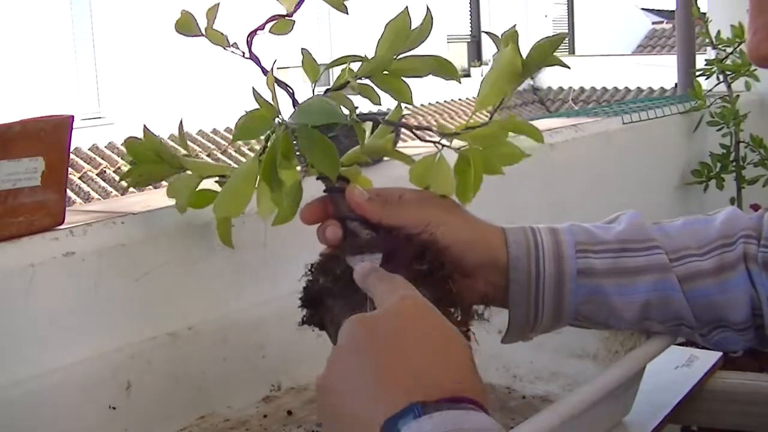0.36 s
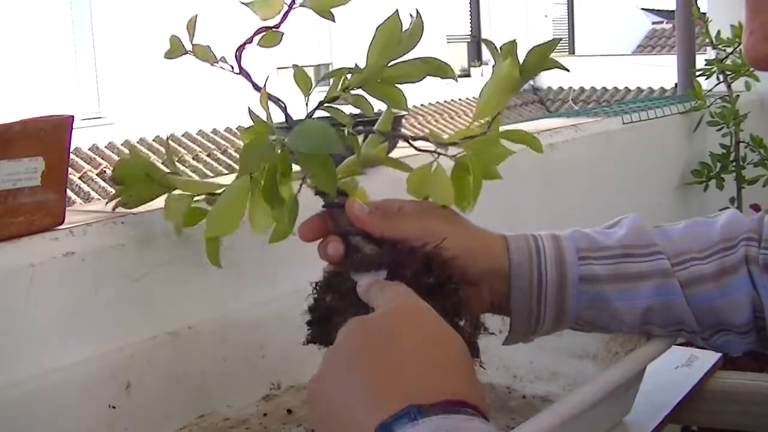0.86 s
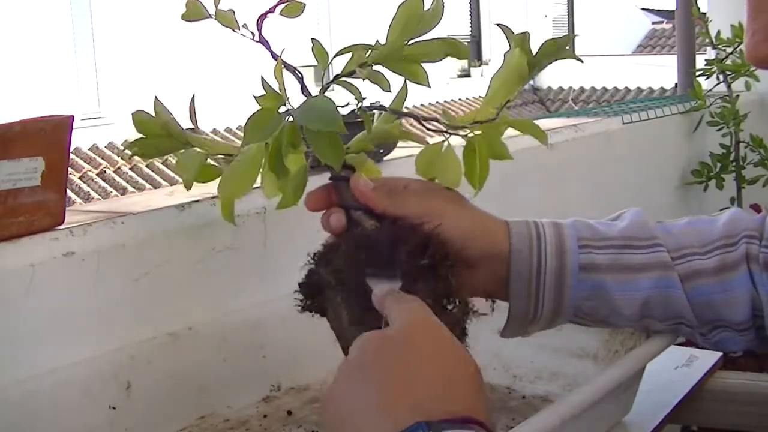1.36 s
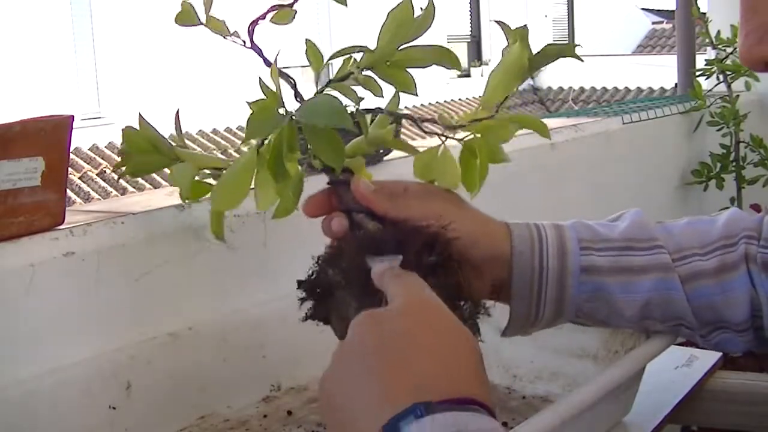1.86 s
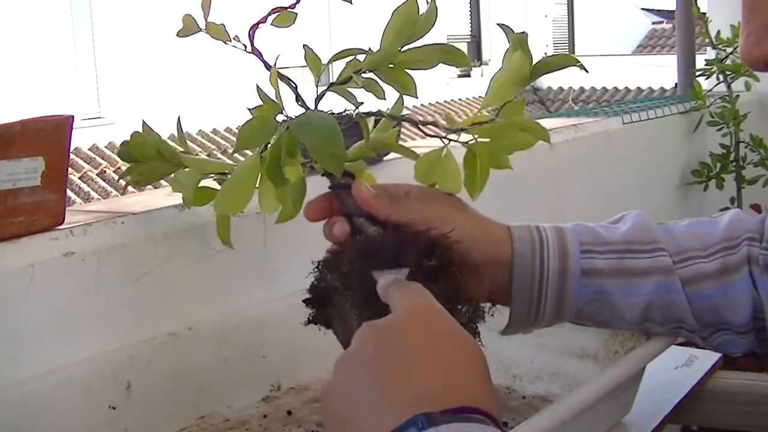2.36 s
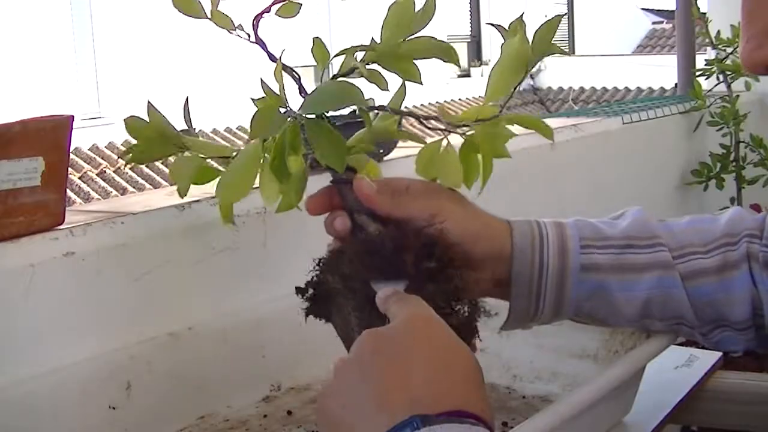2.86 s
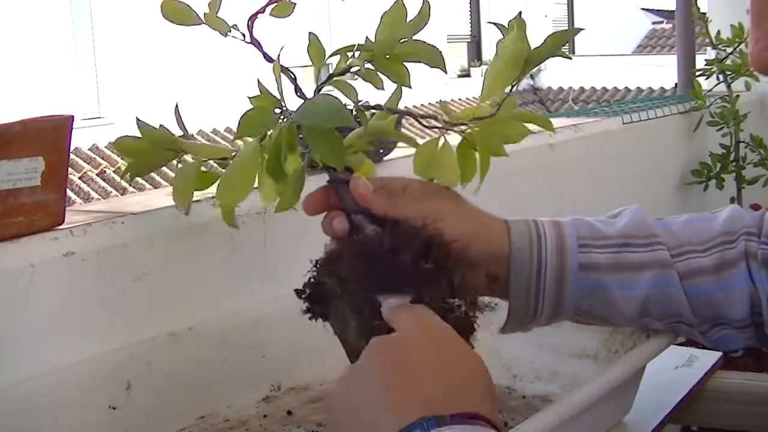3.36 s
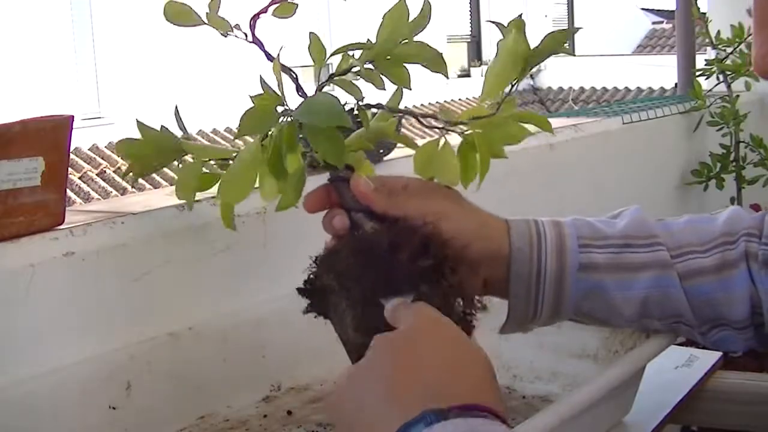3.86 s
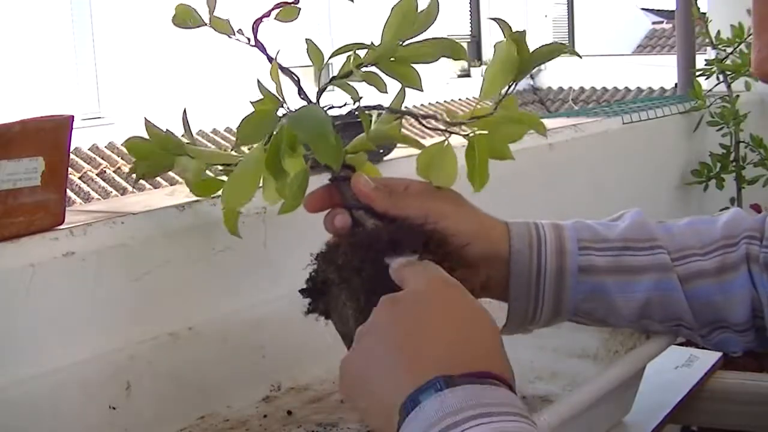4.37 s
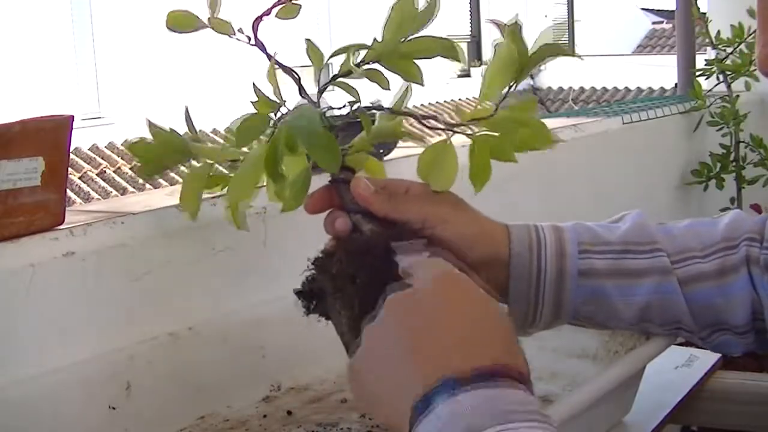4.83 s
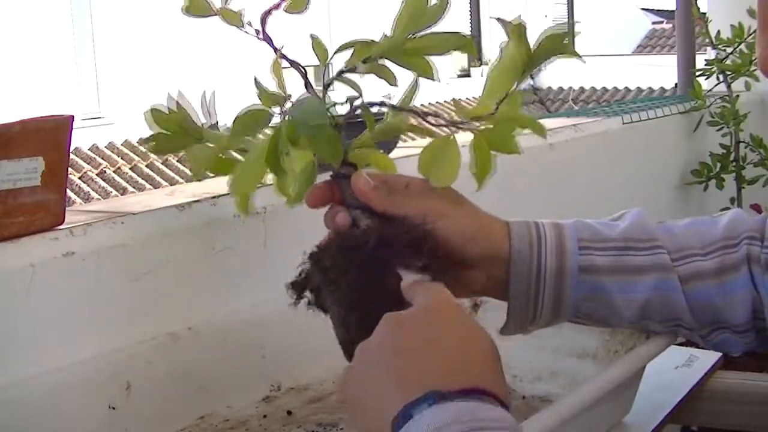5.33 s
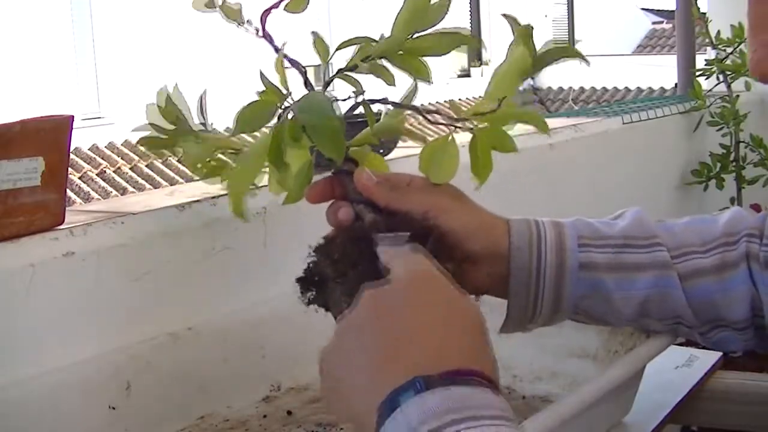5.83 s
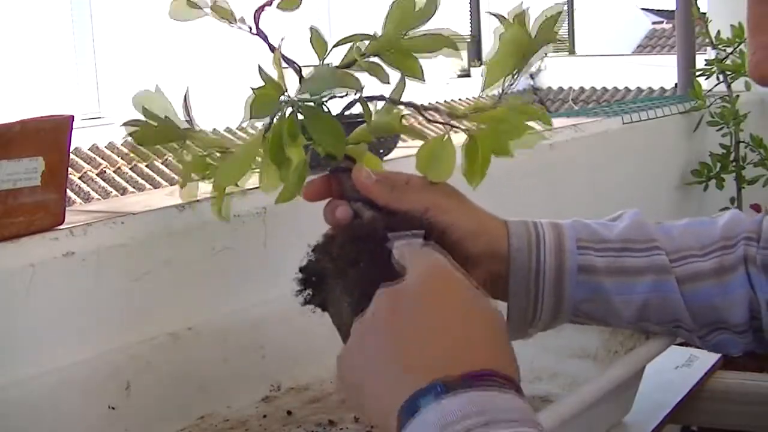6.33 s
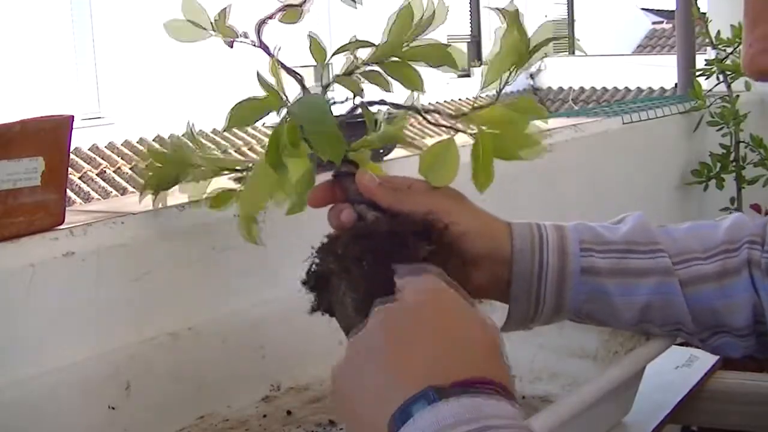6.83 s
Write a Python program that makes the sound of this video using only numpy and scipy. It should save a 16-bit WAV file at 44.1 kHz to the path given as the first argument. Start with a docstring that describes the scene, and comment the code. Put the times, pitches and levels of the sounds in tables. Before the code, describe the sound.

Close, dry crackles and gritty rasps as fingers pick soil from a root ball, with crumbs pattering and a few soft clod thuds outdoors.

```python
"""A walled terrace: fingers pick at a root ball close to the microphone.
Cracks of crust and rootlet are sharp noise breaks with crumbling grains, then crumbs and the walls' brief answer.
Crumbs rasp under the fingertips as dense grainy noise, gated by strokes and chance slips.
Clods thud on the ledge as decaying sines. Behind them shaped noise gives a far town's murmur in the lows and
microphone hiss in the treble, with a few faint wavering hums.
"""
import sys
import numpy as np
from scipy import signal
from scipy.fft import rfft, irfft, next_fast_len
from scipy.io import wavfile
from scipy.ndimage import uniform_filter1d, map_coordinates

SR = 44100
rng = np.random.default_rng(int(sys.argv[2]) if len(sys.argv) > 2 else 0)


def gain_from_decibels(decibels):
    """Convert decibel values to linear amplitude factors."""
    exponent = np.asarray(decibels, float) / 20
    return 10 ** exponent


def transcribe(signal):
    """Save signal, clipped to [-1, 1], as a 16-bit WAV file at the path in sys.argv[1]."""
    frames = np.atleast_2d(signal).T
    limited = np.clip(frames, -1, 1)
    pcm = np.round(limited * 32767).astype(np.int16)
    wavfile.write(sys.argv[1], SR, pcm)


N = 306936

# Background level, partly raised by nearby hits. Each row: time in seconds, rms level in dB.
BACKGROUND_LEVEL = [(0.0, -57), (0.48, -57), (2.54, -57.5), (2.89, -56.5), (5.41, -56), (5.5, -54),
                    (6.69, -59), (6.96, -54)]
# Background spectrum: far murmur in the lows, steady microphone hiss in the treble.
# Each row: frequency in Hz, relative density in dB per Hz.
BACKGROUND_SPECTRUM = [(15, -63), (25, -11), (113, -11), (271, 9.5), (485, 13.5), (1970, 8.5), (2310, 5.5),
                       (4030, 3.5), (11300, -10.5), (13600, -12.5), (16000, -29)]
# Faint far hums. Each row: start in seconds, end in seconds, mean frequency in Hz, mean peak level in dB.
HUMS = [(1.97, 2.1, 445, -62), (1.92, 1.98, 520, -63), (2.82, 2.96, 680, -62), (3.85, 4.15, 480, -66),
        (4.06, 4.14, 530, -60), (4.28, 4.37, 662, -56), (3.4, 3.85, 1090, -66), (4.85, 5.15, 1090, -65),
        (0, .5, 1095, -68), (2.3, 2.6, 1090, -68)]
# Air noise, opposite in the two ports. Each row: frequency in Hz, relative density in dB per Hz.
AIR_SPECTRUM = [(15, -46), (25, 0), (133, 0), (385, 10), (730, 12.5), (2760, 3.5), (3710, 3), (6530, -2),
                (9000, -42), (11700, -49), (19800, -120)]
AIR_RMS_DB = -72
# Scrambled trace of the scene in the side. Each row: frequency in Hz, side over mid in dB.
SIDE_OVER_MID = [(150, -58), (500, -40), (2000, -24.5), (5000, -16.5), (9000, -21.5), (13000, -25)]

# Soil bands: body, rasp, hiss, fizz. Each row: lower edge in Hz, upper edge in Hz.
SOIL_BANDS = [(650, 1500), (1600, 3800), (3800, 7500), (7500, 12000)]
SOIL_TOP_HZ = 11100  # soil sounds fade above
# Resonances near the microphone. Each row: centre in Hz, width in Hz, gain in dB.
MIC_RESONANCES = [(1320, 490, -2), (2322, 120, 2.5), (3377, 220, 3.5), (4540, 210, -4.5),
                  (5050, 380, -13.5), (6660, 980, -12.5), (8000, 1030, -8), (9680, 710, -7),
                  (11290, 1000, -1.5)]
TOP_CUTOFF_HZ = 13800

# Fingers resting in the soil, rasp to fizz. Each row: mean gain in dB, drift in dB.
RESTING = [(-81.5, -2), (-70.5, 5.5), (-71.5, 5.5)]
# Finger strokes through the soil. Each row: start in seconds, length in seconds, gain in dB at 5.2 kHz,
# brightness in dB per octave.
STROKES = [(0.025, 0.14, -52, 0.5), (0.25, 0.025, -59.5, 2), (0.357, 0.15, -57, -0.5),
           (0.596, 0.023, -54.5, -7.5), (0.66, 0.14, -64, 0.5), (1.033, 0.086, -50, 2.2),
           (1.23, 0.07, -77, 6), (1.328, 0.098, -55.5, 7.5), (1.625, 0.033, -51, 4),
           (1.937, 0.034, -57.5, 6.5), (2.12, 0.032, -68, 7), (2.281, 0.081, -54, 4),
           (2.52, 0.064, -57, 13.5), (2.669, 0.033, -59.5, 3.5), (2.82, 0.17, -61.5, 1),
           (3.077, 0.042, -49, 0.6), (3.184, 0.031, -57.5, 2.5), (3.327, 0.098, -60, 2.5),
           (3.448, 0.057, -55.5, 2), (3.541, 0.17, -60, 2), (3.838, 0.11, -58, 1), (3.95, 0.042, -54, 4),
           (4.105, 0.094, -53.5, 0.5), (4.205, 0.065, -63, 2), (4.371, 0.1, -44.5, -1.5),
           (4.52, 0.028, -58.5, 4), (4.667, 0.14, -47, 2), (4.957, 0.16, -53, 2), (5.18, 0.06, -67, 5),
           (5.343, 0.073, -53.5, -5.5), (5.602, 0.027, -40, -3), (5.717, 0.031, -57, 6.5),
           (5.881, 0.15, -50, -2.5), (6.144, 0.053, -51, -2), (6.203, 0.14, -60, -2.8),
           (6.424, 0.11, -54.5, 0.5), (6.539, 0.043, -49.5, 6), (6.691, 0.086, -47, 1),
           (6.79, 0.15, -55.5, -1)]
PRESS_S, LIFT_S = 0.0049, 0.0078  # time constants of a stroke's rise and fall
SLIPS_PER_S, SLIP_S = 120, 0.0043  # mean rate, nominal length
SLIP_DB, SLIP_SPREAD_DB, SLIP_COLOUR_DB = -3.5, 2.5, 4  # median gain, shared spread, spread per band
BETWEEN_SLIPS_DB = -7

# Clods landing. Each row: time in seconds, peak level in dB.
CLODS = [(0.009, -46), (0.22, -51.5), (0.956, -38), (2.173, -40), (5.498, -44.5), (5.629, -50),
         (6.913, -47)]
# Modes of the ledge. Each row: frequency in Hz, relative level in dB, t60 in seconds.
LEDGE_MODES = [(184, -6, .12), (275, -7, .09), (350, -4, .06), (434, 0, .07), (525, -6, .06)]
LEDGE_LOW_HZ = 128

# Cracks. Each row: time in seconds, level in dB at 3 kHz before the band colour, brightness in dB per octave,
# afterfall of crumbs and echoes in dB before the band offset.
CRACKS = [(0.0308, -47, 6.5, -25), (0.0687, -45, 8.5, -25), (0.1431, -51, 4, -5), (0.2172, -50.5, -8, -13),
          (0.259, -54.5, -2, -13), (0.3497, -47.5, 5, -9), (0.3985, -46, 7.5, -12), (0.4223, -37, 2.2, -11),
          (0.508, -45, -2.5, -13), (0.5408, -40.5, 3.3, -12), (0.5949, -45.5, 5.5, -16),
          (0.6662, -63, 16.5, -10), (0.7171, -41, 5, -9), (0.7885, -57, -1, -13), (0.8665, -25, 1.8, -13),
          (0.9174, -47.0, -3, -8), (0.9521, -36.5, -4, -11), (0.9767, -25.5, 2.5, -13),
          (0.993, -39, -1.5, -4.5), (1.0717, -39, -0.5, -8.5), (1.2351, -52, 1.0, -10),
          (1.345, -54, -3, -10), (1.3576, -47, 7, 2), (1.509, -30.5, 2, -9.5), (1.57, -41.5, 0, -6),
          (1.6077, -50.5, 11.5, -7), (1.6466, -55, -5, -13), (1.7107, -52.0, 4, -7), (1.7215, -50, 0, -8),
          (2.131, -54.5, 0.6, -11), (2.173, -38.5, -4.5, -12), (2.2475, -49, 8, -19),
          (2.2954, -63, 4.8, -16), (2.329, -61, 17, -15), (2.3477, -60, 11, -18), (2.3703, -43.5, 5.5, -5),
          (2.3875, -52, 10, -8), (2.4873, -54, 0.5, -13), (2.5263, -52, 12.5, -22), (2.5536, -43, 1.5, -6),
          (2.5893, -42.0, 4.5, -15), (2.631, -56, -5, -15), (2.6955, -51.0, 6, -18), (2.7626, -39, -7, -10),
          (2.809, -36.5, 2, -8.5), (2.8198, -52, 16, -16), (2.8498, -43.0, 7.5, -10),
          (2.8994, -36.0, 1.5, -12), (2.9918, -51, 1, -7), (3.056, -51.5, -0.1, -19), (3.0794, -61, 7, -10),
          (3.0998, -25.0, 3.3, -12), (3.173, -43.5, 1, -13), (3.2053, -42.5, 0, -13),
          (3.2341, -51, -6, -12), (3.2895, -59, -6, -19), (3.309, -49.5, 1, -15), (3.3367, -54, 10.5, -1),
          (3.4929, -47.5, 6.5, -5), (3.561, -41, 3, -13), (3.5803, -50, 7, -1), (3.7798, -39, 3, -5),
          (3.8445, -43, 10.5, 2), (3.867, -56, 9, -10), (4.057, -25.0, 3, -11.5), (4.1124, -41, 1.5, -19),
          (4.1291, -48, 3, 1), (4.1491, -40, 2, -3), (4.173, -45, -1, -9), (4.227, -52.5, 3, -5),
          (4.3189, -48.5, 0.5, -18), (4.3635, -27, 1, -10), (4.3876, -37.5, 7, -23),
          (4.4116, -36, 3.5, -12), (4.4504, -34.5, 0, -8.5), (4.5458, -51, 2.5, -9),
          (4.625, -42, 4.5, -8.5), (4.6567, -45, 6.5, -21), (4.6707, -40.5, 7, -1),
          (4.6788, -28.5, -3, -11.5), (4.7204, -34.5, -2.1, -5.5), (4.776, -60, 2, -15),
          (4.8861, -39, 1, -11), (4.9321, -56, -8.5, -22), (4.9602, -49, 8, -16), (5.0194, -69, 3, -13),
          (5.0306, -51, 11, -5), (5.0692, -42, 13, -11), (5.1685, -38.0, 4.5, -15), (5.2416, -55, 4, -17),
          (5.3001, -37, 2.5, -10), (5.357, -33, 9, -9), (5.363, -28.5, 2.5, -9), (5.3968, -49, 1.2, -11),
          (5.4122, -46.0, 2, -7), (5.4313, -46.5, -2, -9), (5.4623, -47.5, 3.5, -13),
          (5.5022, -43.0, -7, -11), (5.532, -57, -2, -16), (5.5523, -33, -1.5, -12), (5.6029, -44.5, 8, -1),
          (5.6284, -18.0, -0.5, -9.5), (5.6777, -30.5, 3.5, -8), (5.7214, -45, 2, -9),
          (5.7352, -46.5, -2.7, -6), (5.7883, -57.5, -10, -13), (5.887, -40, 11, -10),
          (5.9285, -38.5, 4, -3), (5.9334, -40, -2, -27), (5.9885, -29.0, 3.5, -13), (6.0371, -48, 3, -8),
          (6.0564, -39.0, 5.5, -12), (6.0826, -47.0, -0.9, -20), (6.123, -49.5, 4, -6),
          (6.154, -53, 8, -11), (6.1776, -26.5, 2.1, -10.5), (6.234, -52, 0, -13), (6.2788, -54, 4.5, 11),
          (6.3312, -53, 6, -18), (6.3446, -45.5, 5.5, -1), (6.42, -44, -1.5, -10), (6.4321, -43, 9.5, -6),
          (6.533, -52, 5.3, -9), (6.5552, -37, 4, -9.5), (6.584, -48, 3.4, -8), (6.6594, -54, 5, -5),
          (6.7054, -53.5, 10.5, -19), (6.744, -37.5, -1, -0.5), (6.7557, -28, 4, -11.5),
          (6.8338, -43.5, -2, -4.5), (6.8805, -36, 4.5, -16), (6.9043, -48, 5, -11),
          (6.9138, -41.5, -3, -6), (6.9462, -49.5, 3.5, -13)]
# Crack decay in each soil band. Each row: crumbling t60 in seconds, afterfall offset in dB,
# afterfall t60 in seconds.
CRACK_DECAYS = [(0.016, 8.5, 0.12), (0.016, 1.5, 0.13), (0.015, -2.5, 0.12), (.013, -2, 0.11)]
# An even crack. One entry per soil band: level offset in dB.
CRACK_COLOUR_DB = [-6.5, 5, 4.5, -3]
BREAK_HEIGHT = 3.6  # pulse added to the crumbling grains


def unit(x):
    """Rms 1."""
    return x / np.sqrt(np.mean(x ** 2) + 1e-20)


def along(points, hz):
    """(Hz, value) points interpolated on a log axis."""
    point_hz, value = np.transpose(points)
    return np.interp(np.log(hz + 1), np.log(point_hz + 1), value)


def curves(rows):
    """One value per sample for each column after the time."""
    time_s, *columns = np.transpose(rows)
    return [np.interp(np.arange(N) / SR, time_s, column) for column in columns]


def wobble(knots_per_s):
    """Smooth random curve."""
    knots = rng.standard_normal(int(N * knots_per_s / SR) + 4)
    return map_coordinates(knots, [np.arange(N) * knots_per_s / SR])


def filtered(x, response):
    """x times a complex response of frequency."""
    n = x.shape[-1]
    padded = next_fast_len(n + 4096)
    spectrum = rfft(x, padded) * response(np.fft.rfftfreq(padded, 1 / SR))
    return irfft(spectrum, padded)[..., :n]


def band(hz, lo_hz, hi_hz):
    """Causal band-pass: two second-order high-passes and two low-passes."""
    up, down = 1j * hz / lo_hz, 1j * hz / hi_hz
    high_pass = up ** 2 / (1 + np.sqrt(2) * up + up ** 2)
    low_pass = 1 / (1 + np.sqrt(2) * down + down ** 2)
    return (high_pass * low_pass) ** 2


def case(hz, flat_db):
    """Resonances near the microphone, summed with a flat path."""
    total = gain_from_decibels(flat_db)
    for centre_hz, width_hz, db in MIC_RESONANCES:
        damping = 1j * hz * width_hz
        total = total + gain_from_decibels(db) * damping / (centre_hz ** 2 - hz ** 2 + damping)
    return total


def octaves(lo_hz, hi_hz, pivot_hz):
    """Octaves from the pivot up to the middle of a band."""
    return np.log2(np.sqrt(lo_hz * hi_hz) / pivot_hz)


def placed(rows, start_s):
    """Rows of sound summed at their start times."""
    at = np.round(start_s * SR).astype(int)[:, None] + np.arange(rows.shape[1])
    return np.bincount(at.ravel(), rows.ravel(), N + SR)[:N]


def background():
    """Far murmur and microphone hiss: shaped noise with shallow patches in time and frequency."""
    z = signal.stft(rng.standard_normal(N), nperseg=1024)[2]
    patches = uniform_filter1d(rng.standard_normal(z.shape), 3, 0)
    patches = uniform_filter1d(patches, 8, 1)
    noise = signal.istft(z * gain_from_decibels(1.6 * unit(patches)), nperseg=1024)[1][:N]
    shaped = filtered(noise, lambda hz: gain_from_decibels(along(BACKGROUND_SPECTRUM, hz)))
    return gain_from_decibels(curves(BACKGROUND_LEVEL)[0]) * unit(shaped)


def hums():
    """Short far tones, swelling and fading, with wavering level and phase."""
    t, total = np.arange(N) / SR, 0
    waver = wobble(30)
    for start_s, end_s, hz, db in HUMS:
        progress = np.clip((t - start_s) / (end_s - start_s), 0, 1)
        swell = np.sqrt(np.sin(np.pi * progress).clip(0))
        tone = np.sin(2 * np.pi * hz * t + 1.2 * waver)
        total = total + gain_from_decibels(db + 3 * waver) * swell * tone
    return total


def air():
    """Steady shaped noise for the side."""
    noise = rng.standard_normal(N)
    return gain_from_decibels(AIR_RMS_DB) * unit(filtered(noise, lambda hz: gain_from_decibels(along(AIR_SPECTRUM, hz))))


def slips():
    """Chance slips swell and fade smoothly, each with its own size, length and colour; one gain per band."""
    count = int(SLIPS_PER_S * N / SR)
    start_s = rng.random(count) * N / SR
    size, span, *colours = rng.standard_normal((count, 5)).T
    t = np.arange(SR // 10) / SR - .03  # 0 at the slip's middle
    length_s = np.clip(SLIP_S * np.exp(.5 * span), .002, .04)
    width_s = np.where(t < 0, .45, .7) * length_s[:, None]
    shape = np.exp(-(t / width_s) ** 2)
    gains = []
    for colour in colours:
        db = SLIP_DB + SLIP_SPREAD_DB * size + SLIP_COLOUR_DB * colour
        gains.append(placed(gain_from_decibels(db)[:, None] * shape, start_s))
    return gains


def strokes(lo_hz, hi_hz):
    """Gain in one band as each stroke presses, holds and lifts."""
    start_s, length_s, db, bright = np.transpose(STROKES)
    t = np.arange(SR // 4) / SR
    press = 1 - np.exp(-t / PRESS_S)
    lift = np.exp(-np.clip(t - length_s[:, None] + LIFT_S, 0, 1) / LIFT_S)
    gain = gain_from_decibels(db + bright * octaves(lo_hz, hi_hz, 5200))
    return placed(gain[:, None] * press * lift, start_s)


def rub():
    """Dense soil grains scrape under the skin, steadily and in slips; bands share only part of the clumps."""
    shared_db, total = 1.2 * wobble(90) + 3.3 * wobble(600), 0
    for (lo_hz, hi_hz), (rest_db, drift_db), slip in zip(SOIL_BANDS[1:], RESTING, slips()):
        grains = gain_from_decibels(shared_db + 1.5 * wobble(200)) * rng.standard_normal(N)
        scrape = filtered(grains, lambda hz: band(hz, lo_hz, hi_hz) * case(hz, flat_db=-11))
        contact = gain_from_decibels(rest_db + drift_db * wobble(6)) + strokes(lo_hz, hi_hz)
        total = total + contact * (gain_from_decibels(BETWEEN_SLIPS_DB) + slip) * unit(scrape)
    return total


def clods():
    """A soft low blow rings the ledge's damped modes, their balance scattered from clod to clod."""
    start_s, peak_db = np.transpose(CLODS)
    t = np.arange(SR // 5) / SR
    scatter = rng.standard_normal((len(start_s), len(LEDGE_MODES)))
    ring = 0
    for k, (hz, db, t60_s) in enumerate(LEDGE_MODES):
        ring = ring + gain_from_decibels(db + 2.2 * scatter[:, [k]] - 60 * t / t60_s) * np.sin(2 * np.pi * hz * t)
    ring = ring * (1 - np.exp(-t / .002))  # soft onset
    ring = filtered(ring, lambda hz: band(hz, LEDGE_LOW_HZ, 4000))
    return placed(ring * (gain_from_decibels(peak_db) / np.abs(ring).max(1))[:, None], start_s)


def cracks():
    """A sharp break, a few ms of crumbling grains, then lumpy crumbs and the walls' slower answer."""
    start_s, level_db, bright, after_db = np.transpose(CRACKS)
    t = np.arange(SR // 10) / SR
    noise = rng.standard_normal((len(start_s), 3 + len(SOIL_BANDS), len(t)))
    grains = noise[:, 0] * gain_from_decibels(2.5 * noise[:, 1]) * (1 - np.exp(-t / .0003))
    grains[:, 12] += BREAK_HEIGHT
    total = 0
    bands = zip(SOIL_BANDS, CRACK_DECAYS, CRACK_COLOUR_DB)
    for k, ((lo_hz, hi_hz), (crumble_t60_s, wall_db, wall_t60_s), even_db) in enumerate(bands):
        db = level_db + even_db + bright * octaves(lo_hz, hi_hz, 3000)
        colour = lambda hz: band(hz, lo_hz, hi_hz) * case(hz, flat_db=4.5)
        snap = filtered(grains * gain_from_decibels(-60 * t / crumble_t60_s), colour)
        snap_rms = snap[:, :SR // 200].std(1)[:, None]  # first 5 ms
        lumps = gain_from_decibels(2.5 * unit(uniform_filter1d(noise[:, 3 + k], size=90)))
        answer = unit(filtered(noise[:, 2] * lumps, colour))
        answer *= 1 - np.exp(-(t / .004) ** 2)
        answer *= gain_from_decibels(after_db[:, None] + wall_db - 60 * t / wall_t60_s)
        total = total + gain_from_decibels(db)[:, None] * (snap / snap_rms + answer)
    return placed(total, start_s)


def scrambled_trace(mid):
    """The mid with its short-time phases randomised, at the side's level."""
    z = signal.stft(mid, nperseg=64)[2]
    random_phase = np.exp(2j * np.pi * rng.random(z.shape))
    scrambled = signal.istft(z * random_phase, nperseg=64)[1][:N]
    return filtered(scrambled, lambda hz: gain_from_decibels(along(SIDE_OVER_MID, hz)))


def scene():
    """Two microphone ports hear nearly the same; the side holds a scrambled trace and air."""
    soil = filtered(cracks() + rub(), lambda hz: 1 / np.sqrt(1 + (hz / SOIL_TOP_HZ) ** 16))
    mid = soil + clods() + background() + hums()
    side = scrambled_trace(mid) + air()
    return np.array([mid + side, mid - side])


def top_cut(x):
    """Nothing passes above the cut-off."""
    return signal.sosfilt(signal.butter(12, 16460, fs=SR, output="sos"), x)


def record(dry):
    """Steep low-pass at 13.8 kHz."""
    mix = filtered(dry, lambda hz: 1 / np.sqrt(1 + (hz / TOP_CUTOFF_HZ) ** 70))
    return top_cut(mix)


dry = scene()
out = record(dry)
transcribe(out)
```